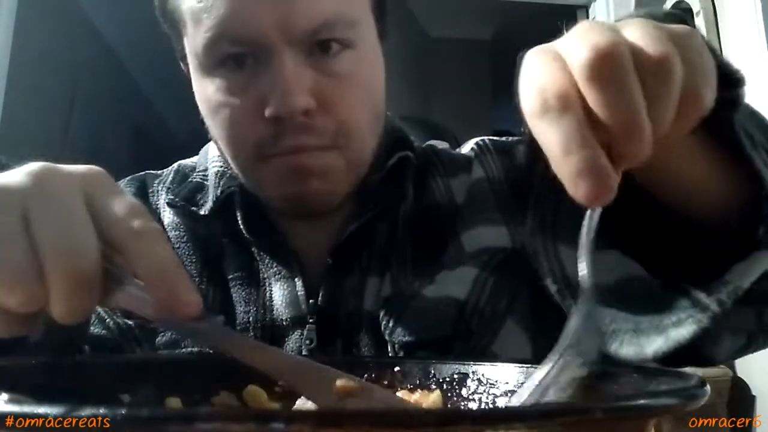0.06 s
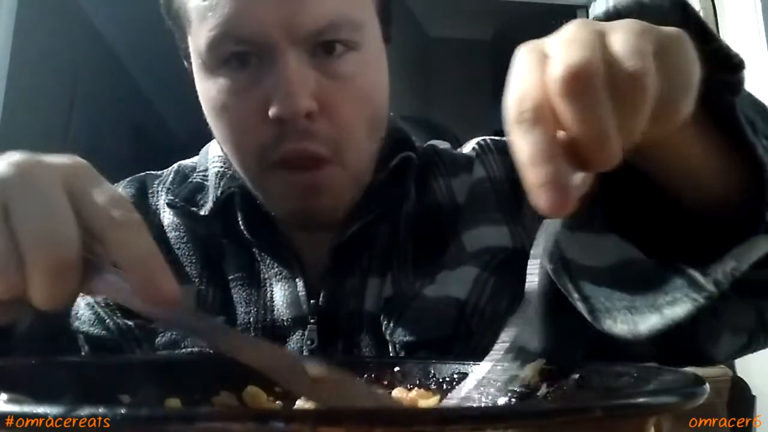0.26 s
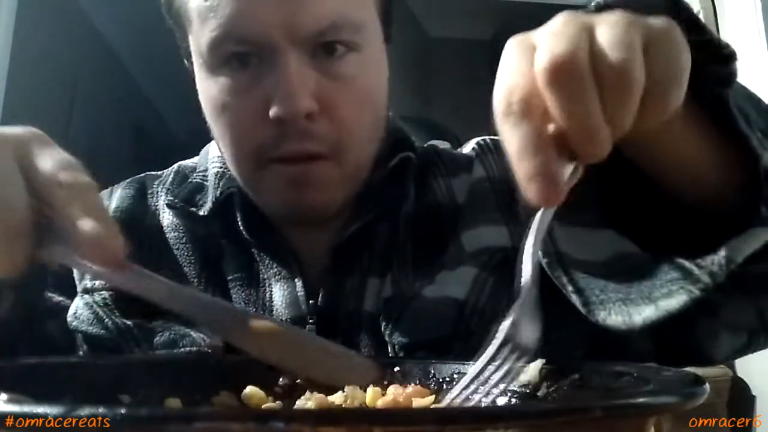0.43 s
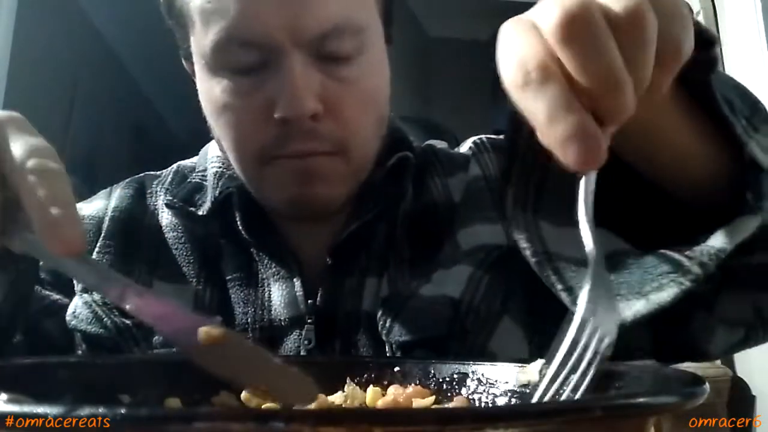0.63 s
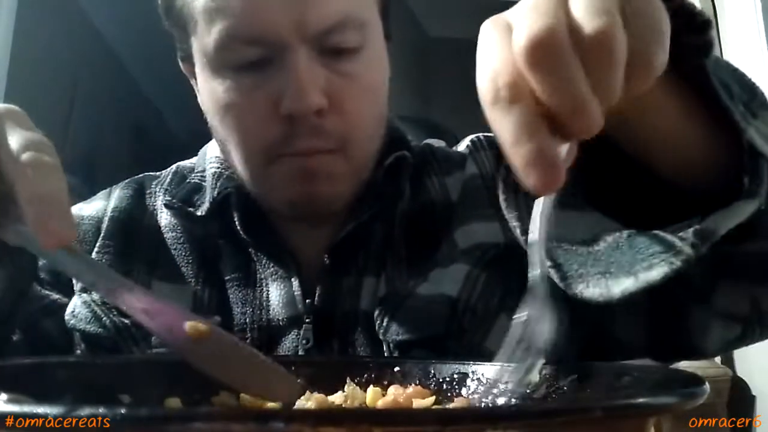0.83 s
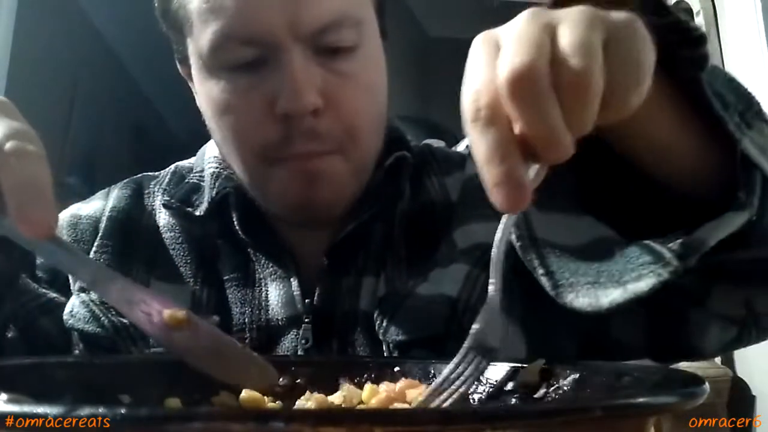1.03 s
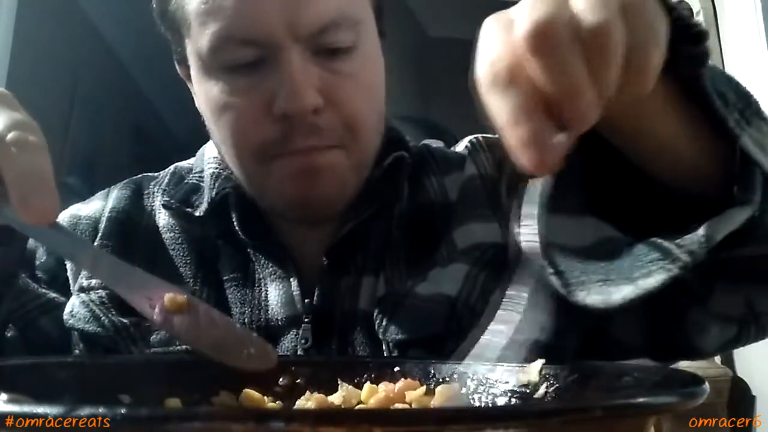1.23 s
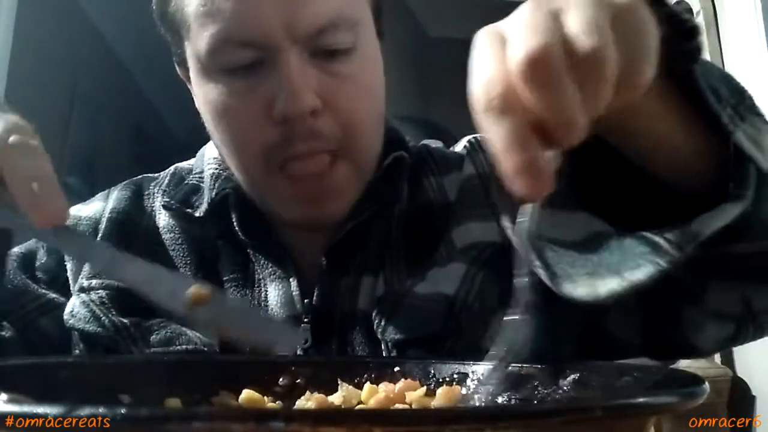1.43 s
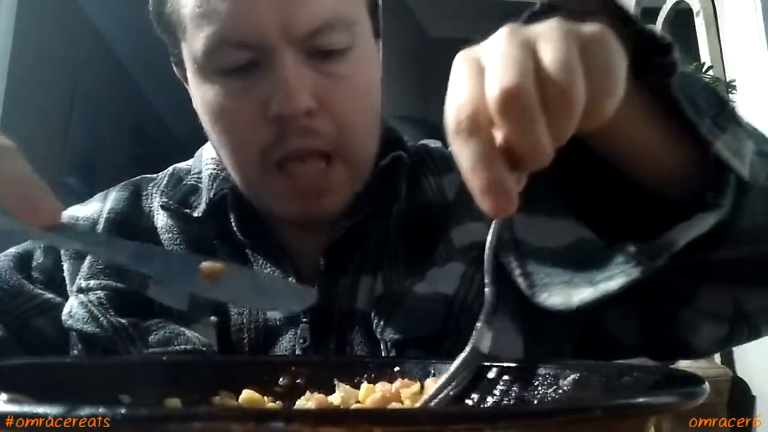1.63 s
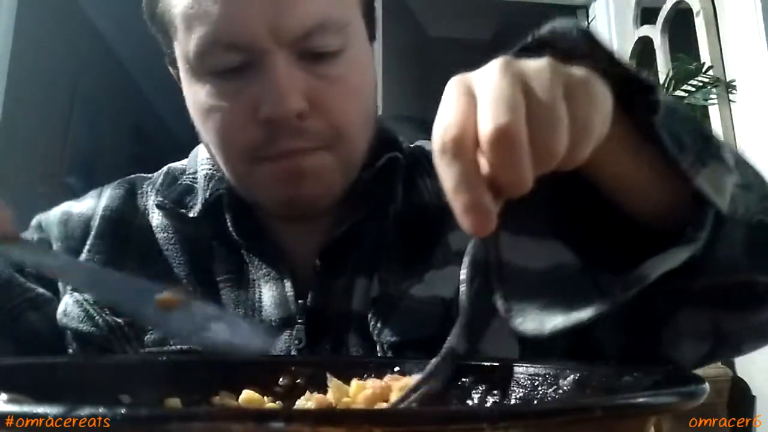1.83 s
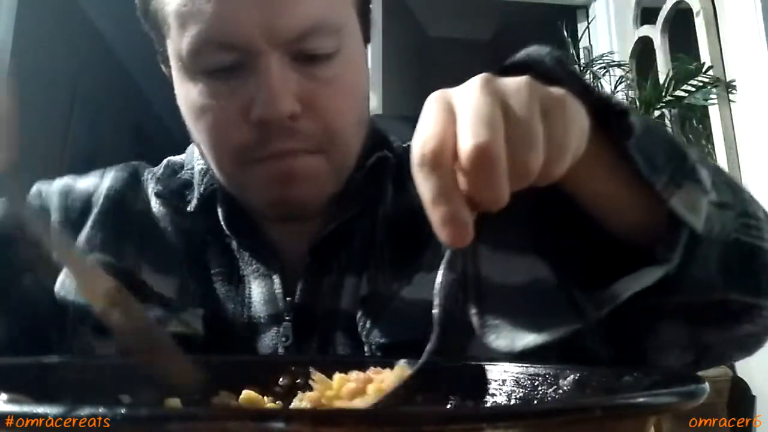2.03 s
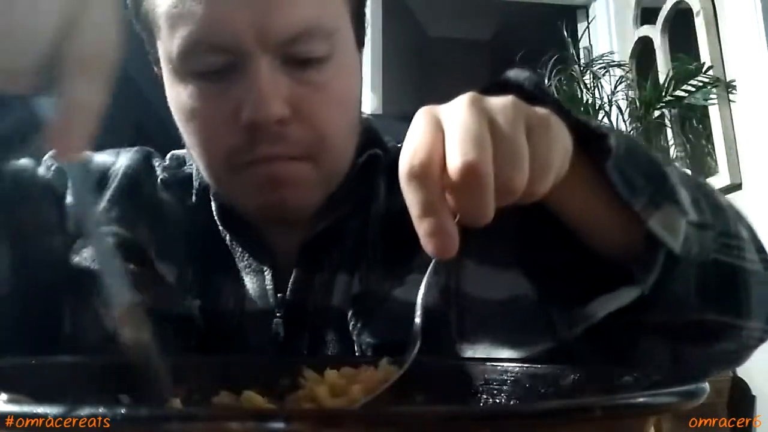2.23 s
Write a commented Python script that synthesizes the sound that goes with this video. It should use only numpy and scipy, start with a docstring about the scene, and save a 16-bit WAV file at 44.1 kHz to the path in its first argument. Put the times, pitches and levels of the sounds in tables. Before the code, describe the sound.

Metal knife and fork scrape, squeal and clink on a china plate, close up

```python
"""Knife and fork on a plate

A steel knife and fork work on a china plate on a table, close to a stereo microphone.
The knife chatters down, scrapes and squeals: random jerks shake ringing modes, and the squeal is a gliding tone.
Cutlery clinks as noise bursts plus decaying tones; soft food is rough noise, with dull bumps and wet smacks.
Then the fork drags in a long gritty stroke of jerks and moving resonances, and a last clink comes at the end."""
import sys
import numpy as np
from scipy import signal
from scipy.fft import rfft, irfft, next_fast_len
from scipy.io import wavfile
from scipy.ndimage import uniform_filter1d, map_coordinates

SR = 44100
rng = np.random.default_rng(int(sys.argv[2]) if len(sys.argv) > 2 else 0)


def wav_record(signal):
    """Record a signal, one row per channel, as 16-bit PCM in the file named by sys.argv[1]."""
    frames = np.transpose(np.atleast_2d(signal))
    bounded = np.clip(frames, -1, 1)
    # unit amplitude maps onto the largest positive 16-bit level
    quanta = np.round(bounded * 32767).astype(np.int16)
    wavfile.write(sys.argv[1], SR, quanta)


N = 100062
T = np.arange(N) / SR  # seconds
RING_T = np.arange(SR // 2) / SR  # seconds, for sounds of half a second

# All levels are relative: the sources weigh them again when they mix.
# Background hiss and hum: (frequency [Hz], level [dB])
FLOOR_COLOUR = [(25, -8.5), (70, 0.5), (350, -9), (700, -15), (5000, -25), (16000, -34)]
# Microphone pair: (frequency [Hz], left over right [dB])
LEFT_RIGHT_BALANCE = [(60, -0.5), (350, 4.5), (750, -1.5), (1400, 3.5), (3200, -2.5), (8000, -4),
                      (11000, 7), (15000, 6.5)]
# How alike the two channels are: (frequency [Hz], likeness [0 to 1])
CHANNEL_LIKENESS = [(100, 0.14), (1000, 0.95), (4000, 0.94), (12000, 0.4)]

# Ringing tones of the table: (frequency [Hz], level [dB])
TABLE_MODES = [(102, -16), (160, -8.5), (192, -1), (325, -9), (352, -8), (410, -11.5)]
# Bumps passed to the table: (time [s], level [dB])
TABLE_BUMPS = [(.009, -24), (0.151, -40), (0.802, -33.5), (0.878, -24.5), (0.8841, -35), (0.9455, -27),
               (1.422, -30), (1.462, -40)]
# Low rumble of the plate on the table under each stroke: (time [s], level [dB])
RUMBLE_LEVEL = [(.03, -49), (.27, -44.5), (.43, -64), (.55, -90.5), (1.63, -85.5), (1.67, -48.5),
                (1.74, -50.5), (2.06, -51), (2.17, -46.5), (2.26, -46.5)]
# Colour of that rumble: (frequency [Hz], level [dB])
RUMBLE_COLOUR = [(30, -20.5), (70, -16.5), (100, 4.5), (135, -17.5), (195, 6), (265, -12), (340, -2.5),
                 (520, 0.5), (800, -50.5)]

# Loudness of the food being pushed: (time [s], level [dB])
FOOD_LEVEL = [(.81, -47.5), (.86, -49), (.885, -34.5), (.91, -40.5), (.95, -37.5), (1.02, -53),
              (1.05, -87.5), (1.07, -100), (1.45, -100), (1.465, -42), (1.5, -42.5), (1.6, -53.5),
              (1.635, -99), (1.66, -53), (1.69, -42), (1.75, -80.5)]
# Colour of the food's friction: (frequency [Hz], level [dB])
FOOD_COLOUR = [(40, -17), (193, -6.5), (252, -23.5), (329, -0.5), (572, -17), (1360, -18), (3030, -28.5),
               (8500, -54), (12300, -31), (16000, -45.5)]
# Wet smacks: (time [s], level [dB], centre frequency [Hz], a third of the 60 dB fade time [s])
WET_SMACKS = [(0.464, -43.5, 2500, 0.009), (0.485, -36.5, 2154, 0.0068), (0.586, -47, 1635, 0.035),
              (0.603, -42.5, 1596, 0.014), (0.638, -47, 1314, 0.0072), (1.106, -59.5, 433.5, 0.018)]
# Wide, weaker colour around each smack: (frequency [Hz], level [dB])
SMACK_SKIRT_COLOUR = [(220, 12.5), (500, -2), (3000, 2), (6000, -25.5), (12000, -12)]

# Ringing tones of the free plate:
# (frequency [Hz], level [dB], 60 dB fade before shortening [s], left over right [dB], left lead [rad])
PLATE_MODES = [(777.6, -3.5, 0.2, -8, -2.5), (1861, -6.5, .3, 3, 2.5), (3188, 1.5, 0.16, -2, 1.74),
               (4820.5, -5.5, .14, 4.5, 0.5), (6680, -11, .09, 5.5, 1.6), (6924, -17.5, .1, -3.5, 2.5),
               (7694, -18, 0.26, -4, -3.7), (8723, -15, .12, 0.5, 1.5), (10000, -20, 0.15, -1, 1.77),
               (11030, -14, 0.073, 13.5, 9.5), (11500, -23, .11, 11.5, -0.5),
               (13800, -24.5, 0.06, 11.5, -2.5), (13720, -11, 0.084, 9.5, 2)]
# While steel presses on the plate its low modes shift and die sooner:
# (frequency [Hz], level [dB], 60 dB fade before shortening [s], left over right [dB], left lead [rad])
PRESSED_MODES = [(743.3, -2, 0.17, -2.5, -0.64), (1922, -6, 0.22, 8, -4), (3133, -6.5, 0.023, 5, 2.5),
                 (4833, -19.5, 0.09, 0, 2.7)]
# Moments when the plate's free ring stops short: (time [s])
RING_STOP_TIMES = [.425, .85, 1.595, 2.4]
# The steel catches on the glaze and presses harder for a moment: (time [s], peak gain [dB])
GLAZE_CATCHES = [(0.191, 9), (0.248, 9.5), (.274, -0.5), (1.687, 8), (1.82, 4), (1.916, 6), (2.049, 7.5)]

# Steel skids and rattles on after a clink: (start time [s], length [s], level [dB])
SKID_TIMES = [(.738, .062, -30), (1.425, .028, -25), (1.562, .012, -44)]
# Colour of the skids: (frequency [Hz], level [dB])
SKID_COLOUR = [(100, -19.5), (340, 12), (550, -16.5), (1350, 6), (2700, 3.5), (3900, 0.5), (5000, -17),
               (5700, -31.5), (12500, -11.5), (16000, -30)]

# Ringing tones of the knife blade: (frequency [Hz], level [dB])
BLADE_MODES = [(2320, 6.5), (2486, 2.5), (2673, -12), (3340, -0.5), (5700, -21), (7600, -18), (7060, -15),
               (8900, -16), (9900, -15), (10900, -15.5), (11520, -18), (12460, -10.5), (12660, -11),
               (13540, -11), (14360, -20)]
# The blade bouncing as it lands: (time [s], level [dB])
BLADE_BOUNCES = [(.0092, -12), (0.015, -21.5), (0.0203, -11.5), (0.0273, -15)]
# Loudness of the knife's stroke: (time [s], level [dB])
KNIFE_LEVEL = [(.035, -39.5), (.07, -30), (.13, -40.5), (.16, -34), (.28, -31), (.32, -48), (.35, -61),
               (.44, -73)]
# Loudness of its treble: (time [s], level [dB])
KNIFE_TREBLE_LEVEL = [(.02, -34), (.085, -24.5), (.16, -40), (.28, -61.5), (.33, -67), (.445, -66.5)]
# Colour of its gritty scrape: (frequency [Hz], level [dB])
KNIFE_COLOUR = [(200, -29), (550, -27), (780, 12), (1000, -4.5), (1400, 6), (2600, 5), (3400, 5.5),
                (4200, -13), (4900, -3), (5700, -49.5)]
# Colour of its hiss: (frequency [Hz], level [dB])
KNIFE_HISS_COLOUR = [(3500, -33), (5400, -6.5), (12800, -2.5), (16000, -15.5)]
# Path of the squeal: (time [s], pitch before jitter [Hz], level [dB])
SQUEAL_PATH = [(0.044, 3660, -29), (0.067, 3500, -28), (0.092, 3510, -20.5), (0.109, 3526, -18),
               (.135, 3502, -17), (0.148, 3550, -21), (0.161, 3150, -49.5)]
# The blade squeals in two modes, the stronger with overtones: (pitch ratio [times], level [dB])
SQUEAL_TONES = [(1, 0), (.752, -16), (2, -28), (4.05, -28)]

# Loudness of the fork's stroke: (time [s], level [dB])
FORK_LEVEL = [(1.645, -98), (1.667, -47.5), (1.70, -42.5), (1.748, -63.5), (1.775, -44.5), (1.80, -48),
              (1.83, -39), (2.02, -41.5), (2.13, -41), (2.17, -51), (2.21, -48), (2.26, -55.5)]
# The fork leans harder late in its stroke and swells the plate's ring: (time [s], level [dB])
FORK_BITE = [(2.06, -69.5), (2.135, -30), (2.16, -54.5), (2.26, -66)]
# Colour of the fork's grit: (frequency [Hz], level [dB])
FORK_COLOUR = [(200, -9.5), (600, -39), (780, 7), (1000, -1), (2100, 4), (2700, -5), (3300, 2.5),
               (4200, -27), (4950, -8.5), (5400, -80.5), (12500, -28.5), (16000, -43.5)]
# Base pitch of the tines, before their ratios: (time [s], pitch [Hz])
FORK_PITCH_PATH = [(1.65, 2040), (1.83, 2100), (1.96, 2163), (2.05, 2086), (2.13, 1930), (2.25, 1890)]
# Tine resonances: (pitch ratio [times], level [dB], half width [Hz], left over right [dB], left lead [rad])
TINE_MODES = [(0.687, -5.5, 128, -2, -1.14), (1.003, -3, 102.3, -0.5, -0.12)]

# Frequencies at which each clink's free ring is set: (frequency [Hz])
CLINK_TONE_HZ = [750, 1860, 3200, 4800, 7000, 12000]
# Clinks: (time [s], clatter [dB], pressed ring [dB], free ring length [share],
# then six free ring levels, one for each frequency above [dB])
PLATE_CLINKS = [(.048, -24.5, -16.5, 1, -21.5, -24, -27, -16, -29.5, -21.5),
                (.147, -36.5, -21, 1, -25, -18.5, -31, -37.5, -24, -25),
                (.307, -47, -41, 0.85, -38, -16.5, -49, -54, -53.5, -62),
                (.735, -22, -16, 0.93, -25.5, -15, -32, -22.5, -15.5, -14.5),
                (.798, -45, -40, 0.93, -28, -33, -39.5, -35.5, -38.5, -24.5),
                (1.4229, -12, -22, 1, -11.5, -6.5, -15.5, -2, -17.5, -5.5),
                (1.432, -26, -28.5, 0.37, -29, -31.5, -11.5, -20.5, -21.5, -22),
                (2.2606, -16.5, -41, 0.92, -16.5, -14.5, -4.5, -24.5, -1.5, -19.5)]
# Short dense rattle of plate and cutlery: (frequency [Hz], level [dB])
CLATTER_COLOUR = [(60, -15.5), (160, -17.5), (350, 4.5), (550, 0.5), (1000, -7.5), (2000, 14.5),
                  (3400, -1.5), (4300, -0.5), (5000, -10.5), (5900, -31.5), (6900, -23), (13000, -19),
                  (16000, -25)]

FLOOR_DB, ROOM_DB, ROOM_T60 = -78.5, -18, .12  # T60: seconds to fade by 60 dB
TOP_HZ, PORT_LAG_S = 16200, .00018
BLADE_T60, TABLE_T60 = .06, .12
CLATTER_T60, CLATTER_TAIL_DB, CLATTER_TAIL_T60 = .085, -19, .18
STOP_T60 = .1
FLUTTER, FLUTTER_HZ = .22, 260  # depth share; random knots a second for a 4000 Hz mode
SMACK_WIDTH, SMACK_SKIRT_DB, SMACK_RISE_S = 0.16, -19.5, .003  # width in natural log of frequency
CATCH_S = .005  # time from the start of a catch to its peak
SKID_RATE, SKID_CLUMP_DB, SKID_RELEASE_S = 2200, 5, .005  # rate in jerks a second
CHATTER_CRACK_DB = -5.5
SQUEAL_JITTER_HZ, SQUEAL_ROUGH_DB = 32, 2.6  # sizes of random wobbles


def amp(db):
    """Turn decibels into gain."""
    return 10 ** (np.asarray(db) / 20)


def unit(x):
    """Scale a sound to an rms (average strength) of 1."""
    return x / np.sqrt(np.mean(x ** 2) + 1e-20)


def along(points, hz):
    """Read a curve of (frequency, value) points on a log frequency axis."""
    f, v = np.transpose(points)
    return np.interp(np.log(hz + 1), np.log(f + 1), v)


def stroke(rows):
    """Smoothed gain of a (time, level) curve, practically silent outside it."""
    s, db = np.transpose(rows)
    level = np.interp(T, s, db, left=-150, right=-150)
    return uniform_filter1d(amp(level), size=128)


def wobble(rate):
    """A smooth random curve with this many knots a second."""
    return map_coordinates(rng.standard_normal(4096), [T * rate], mode='wrap')


def filtered(x, response):
    """Colour a sound by multiplying its spectrum with a response."""
    n = x.shape[-1]
    m = next_fast_len(n + 8192)
    spectrum = rfft(x, m) * response(np.fft.rfftfreq(m, 1 / SR))
    return irfft(spectrum, m)[..., :n]


def ports(balance_db, lead):
    """Left and right microphone gains; complex numbers hold loudness and phase."""
    left = amp(balance_db / 2) * np.exp(.5j * lead)
    right = amp(-balance_db / 2) * np.exp(-.5j * lead)
    g = np.array([left, right])
    return g / np.sqrt(np.mean(abs(g) ** 2, axis=0))


def heard(hz):
    """Microphone gains for the plate's direction: one side is louder and one side lags."""
    return ports(along(LEFT_RIGHT_BALANCE, hz), -2 * np.pi * hz * PORT_LAG_S)


def spread(pair, spectrum):
    """Blend two unrelated signals into coloured, partly alike stereo of rms 1."""
    def mix(f):
        turn = np.arccos(np.clip(along(CHANNEL_LIKENESS, f), 0, 1)) / 2
        return amp(along(spectrum, f)) * [np.cos(turn), np.sin(turn)]
    shared, apart = filtered(pair, mix)
    return unit(filtered(np.array([shared + apart, shared - apart]), heard))


def burst(spectrum):
    """Half a second of coloured stereo noise."""
    return spread(rng.standard_normal((2, len(RING_T))), spectrum)


def fade(t60):
    """A steady die-away, losing 60 dB in t60 seconds."""
    return 1000. ** (-RING_T / t60)


def ring(modes, length=1, tone=None):
    """Stereo sum of dying, fluttering tones, as of a struck object; tone colours the blow."""
    out = 0
    for hz, db, t60, *place in modes:
        colour_db = along(tone, hz) if tone else 0
        gain = amp(db + colour_db) * (ports(*place) if place else heard(hz))
        knots = RING_T * FLUTTER_HZ * min(hz / 4000, 1.5)
        a, b = (map_coordinates(rng.standard_normal(256), [knots]) for _ in range(2))
        swing = (1 + FLUTTER * (a + 1j * b)) * np.exp(2j * np.pi * hz * RING_T)
        out = out + fade(t60 * length) * np.imag(gain[:, None] * swing)
    return out


def add(out, s, sound):
    """Mix a sound in at time s, cut at the end of the scene."""
    i = max(0, round(s * SR))
    out[:, i:i + sound.shape[1]] += sound[:, :max(0, N - i)]


def slips(rate, clump_db, clump_rate):
    """Stick and slip: tiny random jerks, rate of them a second, whose strength swells in clumps."""
    jerks = (rng.random((2, N)) < rate / SR) * rng.standard_normal((2, N))
    return unit(jerks * amp(clump_db * np.tanh(wobble(clump_rate))))


def pressure(rows):
    """Strength of a stroke; each catch rises quickly and lets go more slowly."""
    catch_db = 0
    for s, db in GLAZE_CATCHES:
        age = np.maximum(T - s, 0) / CATCH_S
        catch_db = catch_db + db * age * np.exp(1 - age)
    return stroke(rows) * amp(catch_db)


def rubbed(modes, force, length=.7, tone=None):
    """Modes answer every jerk of a rubbing force; pressure shortens their ring."""
    answer = ring(modes, length, tone)
    return signal.fftconvolve(force[:1], answer / np.linalg.norm(answer[0]), axes=1)[:, :N]


def floor():
    """Steady, quiet background noise."""
    return amp(FLOOR_DB) * spread(rng.standard_normal((2, N)), FLOOR_COLOUR)


def room(dry):
    """A small room answers with a fading noise tail of many tiny echoes."""
    tail = rng.standard_normal((2, len(RING_T))) * fade(ROOM_T60) * (RING_T > .003)
    return amp(ROOM_DB) * signal.fftconvolve(dry, tail / np.linalg.norm(tail[0]), axes=1)[:, :N]


def table():
    """Pushes on the plate make the table ring dully; the strokes make it rumble."""
    out = stroke(RUMBLE_LEVEL) * spread(rng.standard_normal((2, N)), RUMBLE_COLOUR)
    modes = [(hz, level, TABLE_T60) for hz, level in TABLE_MODES]
    soft_start = 1 - np.exp(-RING_T / 0.0039)
    for s, db in TABLE_BUMPS:
        add(out, s, amp(db + 2) * ring(modes) * soft_start)
    return out


def food():
    """Soft food rubs over the plate in slow clumps, with small wet smacks of narrow noise."""
    jerks, press = slips(rate=1700, clump_db=5.0, clump_rate=60), stroke(FOOD_LEVEL)
    out = press * spread(jerks, FOOD_COLOUR)
    out += amp(-10) * rubbed(PLATE_MODES, jerks * press, tone=[(750, 0), (3200, -25), (12000, 0)])
    grid = np.geomspace(40, 16000, 100)  # Hz
    for s, db, hz, length in WET_SMACKS:
        peak = np.exp(-(np.log(grid / hz) / SMACK_WIDTH) ** 2)
        colour = peak + amp(SMACK_SKIRT_DB + along(SMACK_SKIRT_COLOUR, grid))
        roughness = amp(3.5 * wobble(500)[:len(RING_T)])
        shape = (1 - np.exp(-RING_T / SMACK_RISE_S)) * fade(3 * length) * roughness
        add(out, s, amp(db + 9.0) * shape * burst(list(zip(grid, 20 * np.log10(colour)))))
    return out


def skids():
    """Clumps of tiny contacts keep a clank rattling and shake the pressed plate."""
    press = 0
    for s, length, db in SKID_TIMES:
        release = np.exp(-np.maximum(T - s - length, 0) / SKID_RELEASE_S)
        press = press + amp(db) * (T > s) * release
    jerks = slips(rate=SKID_RATE, clump_db=SKID_CLUMP_DB, clump_rate=580)
    shaken = rubbed(PRESSED_MODES, jerks * press, tone=[(750, 2), (3200, -2.5)])
    return press * spread(jerks, SKID_COLOUR) + amp(1) * shaken


def squeal():
    """The blade locks into a few gliding tones with slightly shaky pitch and loudness."""
    out = np.zeros((2, N))
    s, hz, db = np.transpose(SQUEAL_PATH)
    pitch = np.interp(T, s, hz) + SQUEAL_JITTER_HZ * wobble(170)
    phase = 2 * np.pi * np.cumsum(pitch) / SR
    level = stroke(list(zip(s, db)))
    for ratio, part_db in SQUEAL_TONES:
        rough = amp(part_db + SQUEAL_ROUGH_DB * wobble(100))
        part = level * rough * np.exp(1j * ratio * phase)
        out += np.imag(heard(ratio * hz.mean())[:, None] * part)
    return out


def knife():
    """The blade bounces, then its jerky scrape shakes blade and plate and briefly squeals."""
    out = np.zeros((2, N))
    blade = [(hz, db, BLADE_T60) for hz, db in BLADE_MODES]
    for s, db in BLADE_BOUNCES:
        crack = amp(CHATTER_CRACK_DB) * burst(CLATTER_COLOUR) * fade(0.038)
        add(out, s, amp(db) * (ring(blade) + crack))
    jerks, press = slips(rate=9000, clump_db=2, clump_rate=240), pressure(KNIFE_LEVEL)
    out += amp(3.0) * press * spread(jerks, KNIFE_COLOUR)
    out += amp(-8) * rubbed(PRESSED_MODES, jerks * press)
    plate_tone = [(1860, -0.5), (3200, 3), (4800, 6), (7000, -1.5), (12000, -8.5)]
    out += amp(-3.5) * rubbed(PLATE_MODES, jerks * press, tone=plate_tone)
    hiss, treble = slips(rate=9600, clump_db=4.5, clump_rate=200), stroke(KNIFE_TREBLE_LEVEL)
    out += treble * amp(-11) * spread(hiss, KNIFE_HISS_COLOUR)
    out += amp(2) * rubbed(blade, hiss * treble, tone=[(2300, -9), (3400, -4.5), (7000, -1)])
    return out + squeal()


def fork():
    """The tines judder and make the plate ring; their resonances move with the fork's angle."""
    jerks = slips(rate=6000, clump_db=3.5, clump_rate=240)
    press, bite = pressure(FORK_LEVEL), stroke(FORK_BITE)
    out = amp(1.5) * press * spread(jerks, FORK_COLOUR)
    out += rubbed(PRESSED_MODES, jerks * (amp(-2.5) * press + amp(-3.5) * bite))
    out += amp(-4.5) * rubbed(PLATE_MODES, jerks * bite, tone=[(3200, 13), (4800, -22.5)])
    press_tone = [(750, 2), (3200, -5), (7000, -0.5), (12000, -5.5)]
    out += amp(-13.5) * rubbed(PLATE_MODES, jerks * press, tone=press_tone)
    phase = 2 * np.pi * np.cumsum(np.interp(T, *np.transpose(FORK_PITCH_PATH))) / SR
    for ratio, db, width, balance_db, lead in TINE_MODES:
        turn = np.exp(1j * ratio * phase)
        # shift the moving pitch down to zero, smooth the jerks there, then shift back up
        smoother = RING_T ** 2 * np.exp(-2 * np.pi * 2 * width * RING_T)
        swing = signal.fftconvolve(jerks[0] / turn, smoother)[:N] * turn
        out += amp(db) * press * unit(np.real(ports(balance_db, lead)[:, None] * swing))
    return out


def clinks():
    """Steel strikes china: a dense clatter, a short ring under the steel and the plate's free ring."""
    out = np.zeros((2, N))
    clatter_fade = fade(CLATTER_T60) + amp(CLATTER_TAIL_DB) * fade(CLATTER_TAIL_T60)
    for s, clatter_db, pressed_db, length, *tone_db in PLATE_CLINKS:
        clatter = burst(CLATTER_COLOUR) * clatter_fade
        stop = min(t for t in RING_STOP_TIMES if t > s) - s
        stopping = amp(-60 * np.maximum(RING_T - stop, 0) / STOP_T60)
        free = ring(PLATE_MODES, length, list(zip(CLINK_TONE_HZ, tone_db))) * stopping
        add(out, s, amp(clatter_db) * clatter + amp(pressed_db) * ring(PRESSED_MODES) + free)
    return out


def scene():
    """All sources in a small, quiet room."""
    dry = clinks() + skids() + knife() + fork() + food() + table()
    return dry + room(dry) + floor()


def record(dry):
    """The recorder cuts the deep bass, rounds off the highest peaks and keeps nothing above TOP_HZ."""
    x = signal.lfilter(*signal.butter(1, 45, 'high', fs=SR), dry)
    rounded = x / (1 + x ** 8) ** (1 / 8)
    return filtered(rounded, lambda f: f < TOP_HZ)


dry = scene()
out = record(dry)
wav_record(out)
```